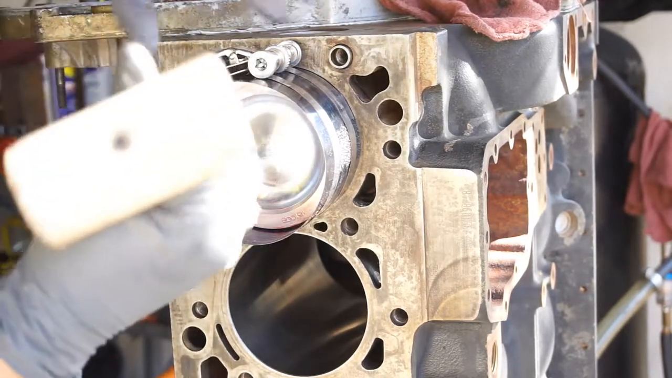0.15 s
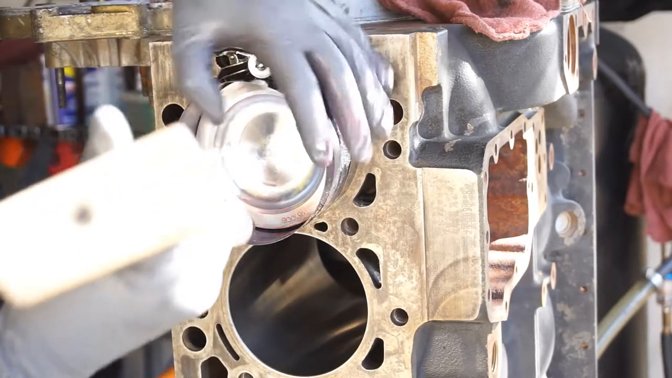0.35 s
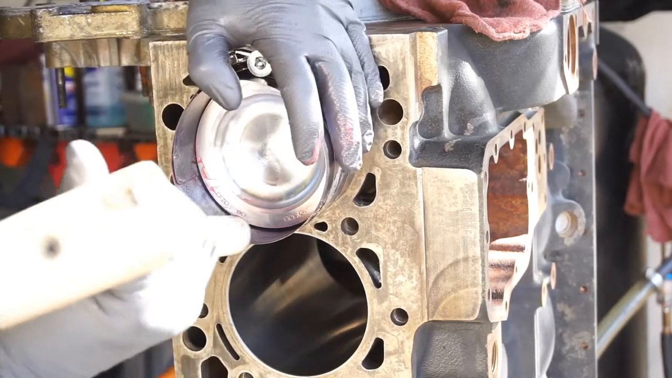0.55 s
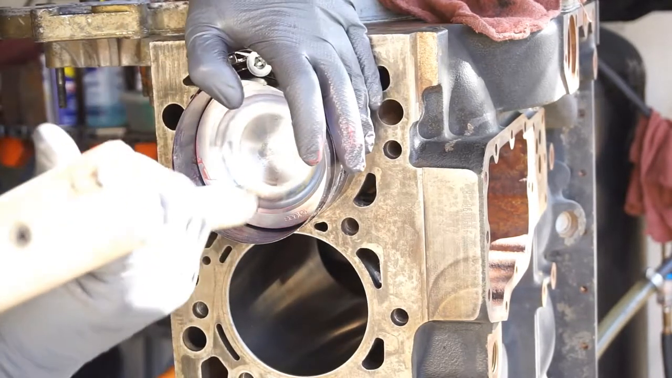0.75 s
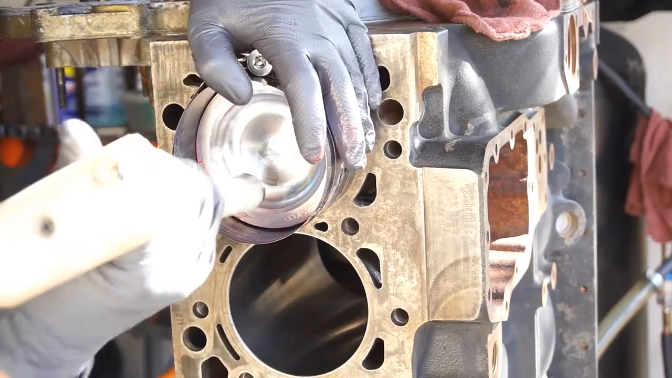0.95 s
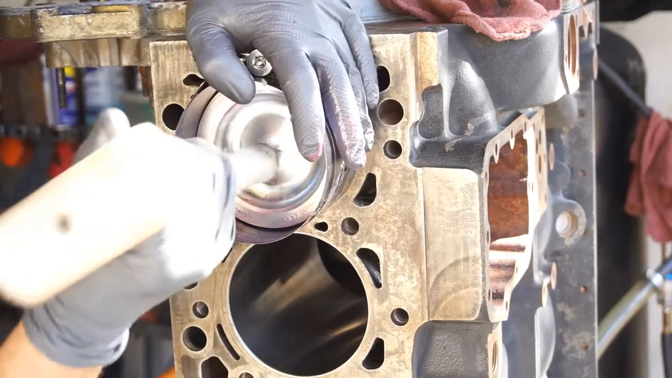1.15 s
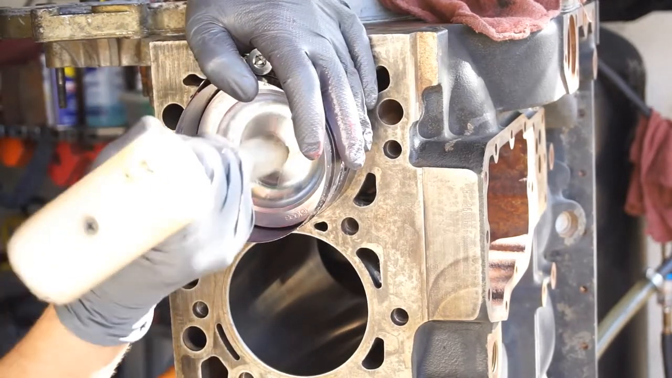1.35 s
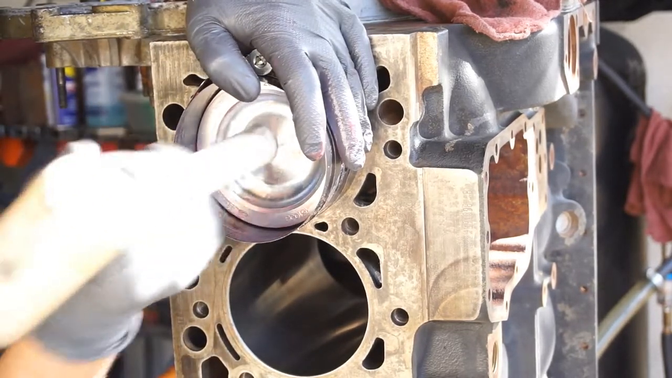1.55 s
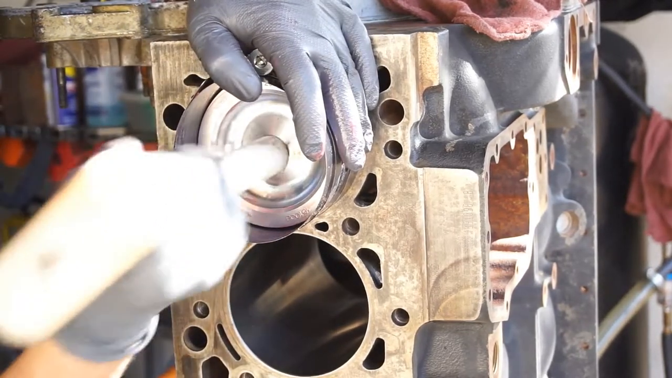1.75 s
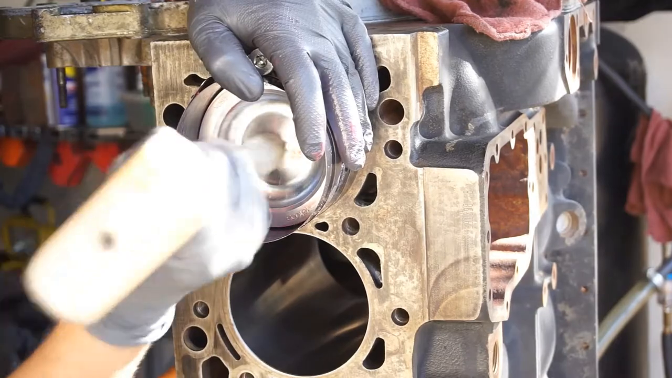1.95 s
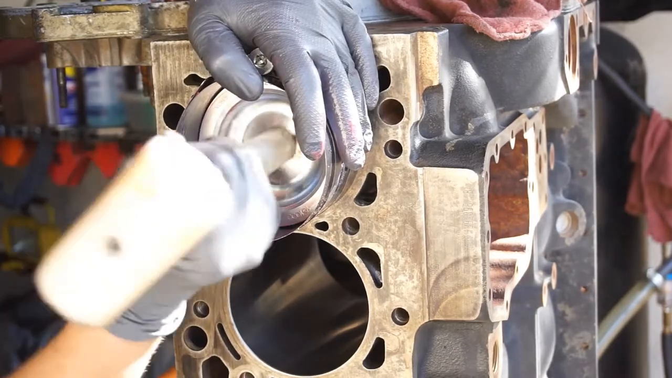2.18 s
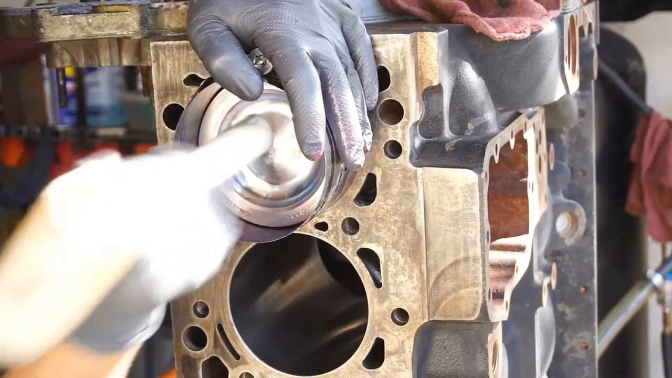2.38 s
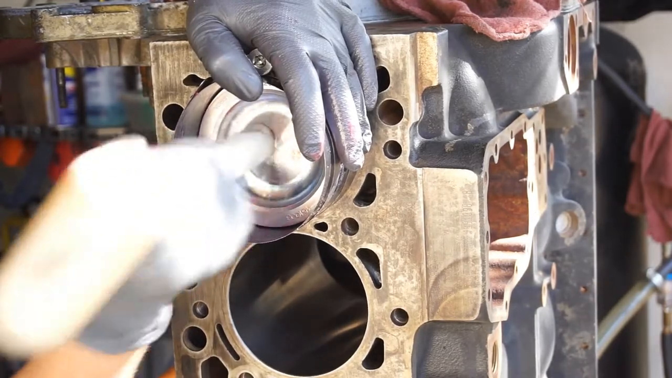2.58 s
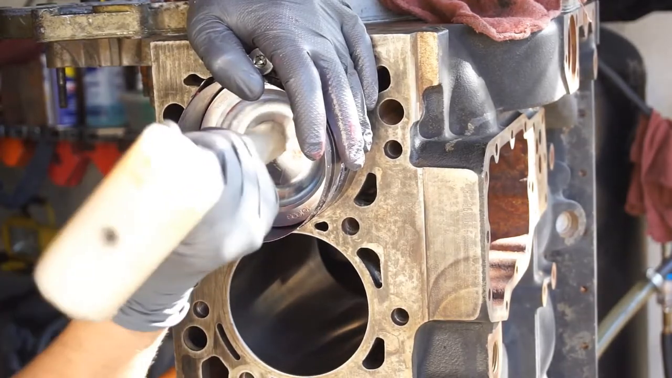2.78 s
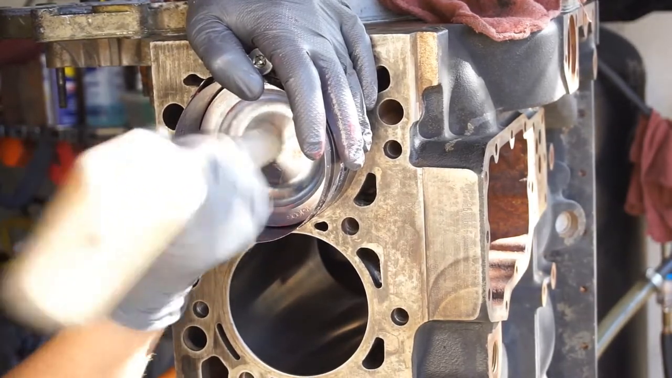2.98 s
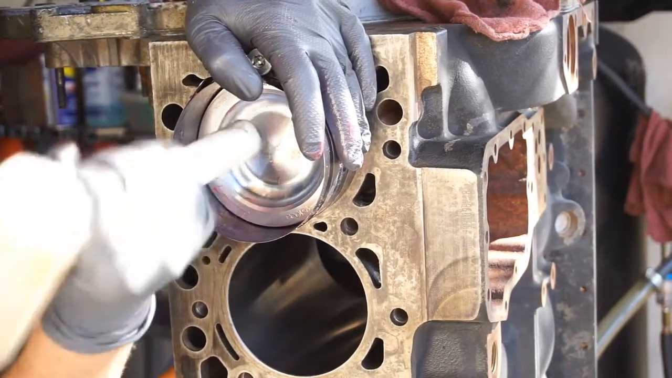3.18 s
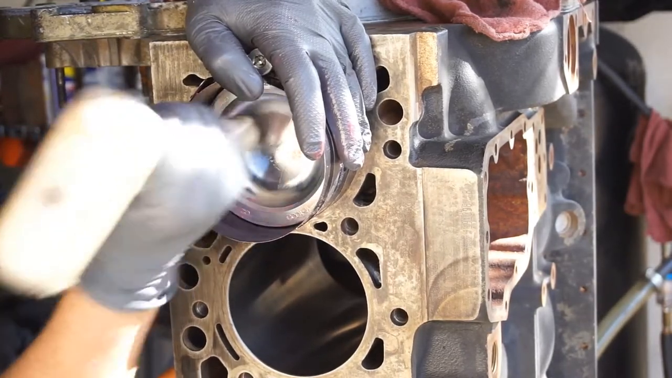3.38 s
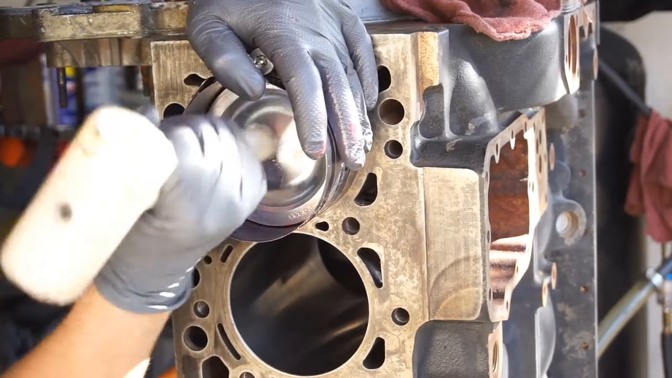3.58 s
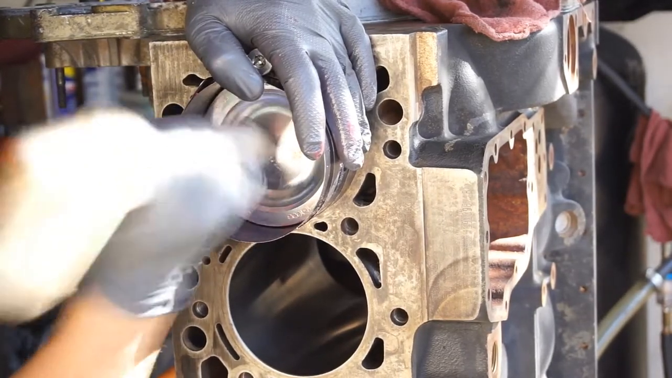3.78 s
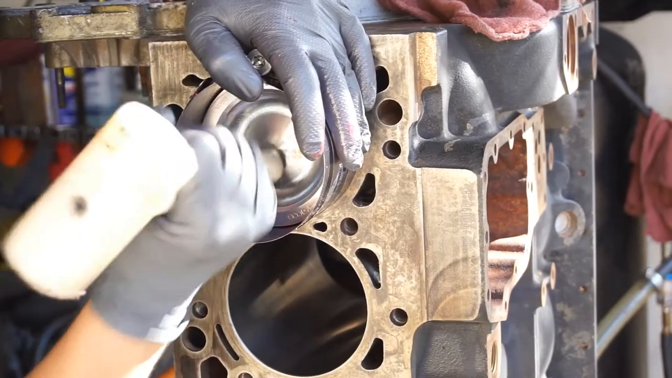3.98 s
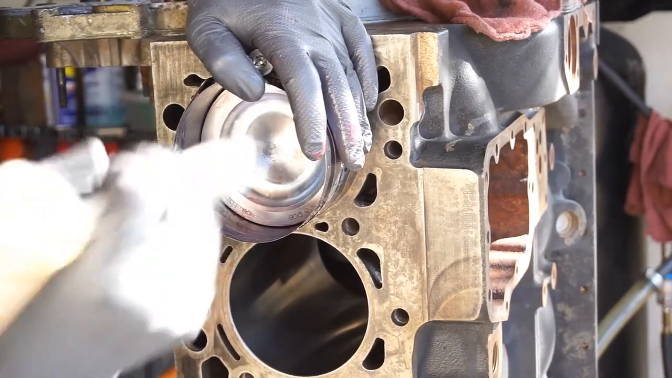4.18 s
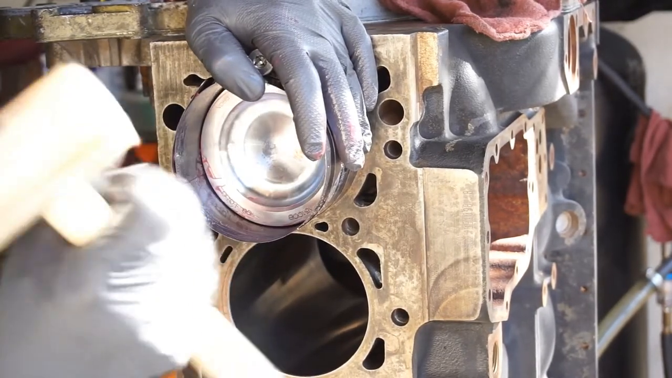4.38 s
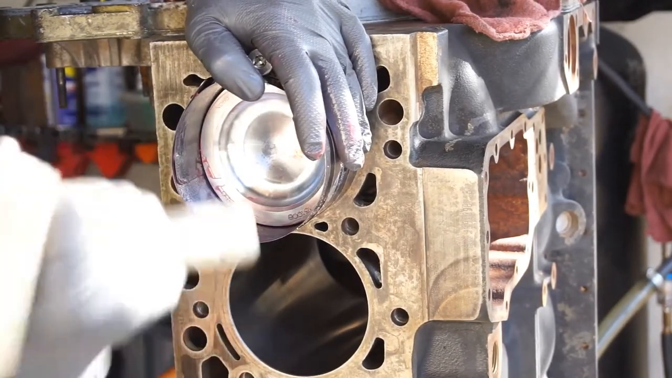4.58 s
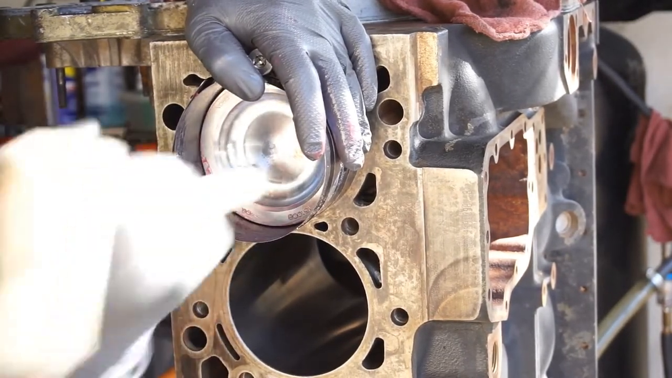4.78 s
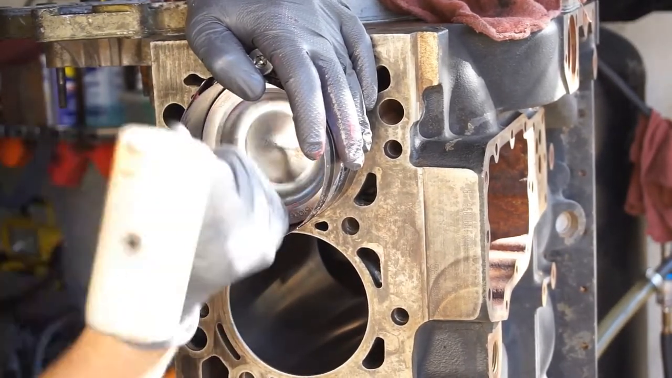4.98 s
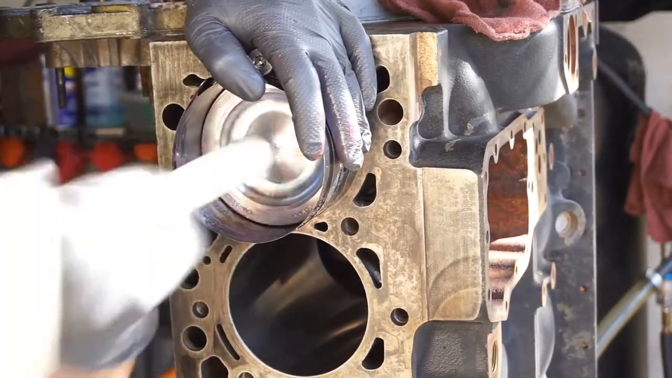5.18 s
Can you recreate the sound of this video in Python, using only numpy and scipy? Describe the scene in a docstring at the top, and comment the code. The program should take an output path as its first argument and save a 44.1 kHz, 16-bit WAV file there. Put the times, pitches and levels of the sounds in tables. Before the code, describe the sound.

Close in a hard-walled workshop, rubber gloves rub and shift with small clicks for just over a second. Then a wooden handle knocks a metal piston ten times, almost four a second, each a woody clack with an instant rebound, a thin steel rattle and hollow block ringing. A pause of about a second brings bright grip clicks, then two more taps. Stereo microphone, taps slightly left.

```python
"""A hard-walled workshop: a wooden hammer handle taps a piston down through a ring compressor into an engine block.
Each tap is a short wood pulse with a rebound milliseconds later; both carry a noisy rattle of the steel band.
Block and workshop answer with decaying noise and modes, recoloured as the piston sinks: ten taps, a pause, two more.
Before the taps and in the pause, gloved hands rub (swelling coloured noise) and shift their grip (noise clicks).
Underneath lie still air, a faint fluttering squeak and a thin wavering tone."""
import sys
import numpy as np
from scipy import signal
from scipy.fft import rfft, irfft, next_fast_len
from scipy.io import wavfile
from scipy.ndimage import map_coordinates

SR = 44100
rng = np.random.default_rng(int(sys.argv[2]) if len(sys.argv) > 2 else 0)


def file_out(sig):
    """Save sig as 16-bit WAV at sys.argv[1]."""
    # one column per channel
    cols = np.atleast_2d(sig).T
    # limit, then scale
    lim = np.clip(cols, -1, 1)
    pcm = np.round(lim * 32767).astype(np.int16)
    wavfile.write(sys.argv[1], SR, pcm)


N = 231348  # length [samples]
TOP_HZ = 11130  # upper band limit

# modes of block and workshop: (frequency [Hz], level [dB])
RESONANCES = [(252, -3), (264, -5), (292, -10.5), (305, -10), (371, -14.5), (390, -20), (443, -12),
              (471, -9.5), (483, -8), (542, -13), (582, -6), (595, -3.5), (616, -9), (627, -10.5),
              (702, -14.5), (750, -7.5), (785, -8), (896, -4.5), (938, -26), (1021, -6.5), (1050, -8),
              (1135, -11), (1163, -14), (1349, -26), (1367, -10.5), (1474, -9), (2083, -12.5), (2111, -6.5),
              (2160, -36), (2271, -11.5)]
# how long block and workshop ring: (frequency [Hz], t60 [s])
DECAY = [(100, 1), (260, 0.98), (600, 0.8), (1400, 0.71), (2200, 0.63), (4000, 0.55), (10000, 0.41)]
# likeness of left and right in diffuse sound: (frequency [Hz], correlation [-1..1])
ALIKE = [(60, 0.93), (150, 0.88), (270, 1), (580, 0.83), (1230, 0.51), (2610, 0.34), (5540, 0.015),
         (11000, 0.21)]


def amp(db):
    """Decibels to gain."""
    return 10 ** (np.asarray(db) / 20)


def unit(x):
    """x scaled to rms 1."""
    return x / np.sqrt(np.mean(x ** 2) + 1e-20)


def along(points, hz):
    """Interpolates (Hz, value) points on a log frequency axis."""
    f, v = np.transpose(points)
    return np.interp(np.log(hz + 1), np.log(f + 1), v)


def wobble(rate):
    """A smooth random curve, rate knots a second."""
    knots = rng.standard_normal(int(N * rate / SR) + 4)
    return map_coordinates(knots, [np.arange(N) * rate / SR])


def filtered(x, response):
    """x shaped by a response of frequency."""
    n = x.shape[-1]
    m = next_fast_len(n + SR // 10)
    return irfft(rfft(x, m) * response(np.fft.rfftfreq(m, 1 / SR)), m)[..., :n]


def pulse(spectrum, size):
    """A minimum-phase pulse: the spectrum's energy arrives as early as it can."""
    hz = np.fft.rfftfreq(size, 1 / SR)
    cepstrum = irfft(np.log(amp(along(spectrum, hz))), size)
    cepstrum[1:size // 2] *= 2
    cepstrum[size // 2 + 1:] = 0
    return irfft(np.exp(rfft(cepstrum)) * (hz < TOP_HZ + 1000), size)


def noise(spectrum, size):
    """Diffuse stereo noise of rms 1, its left-right likeness set by frequency."""
    def colour(hz):
        turn = np.arccos(np.clip(along(ALIKE, hz), -1, 1)) / 2
        return amp(along(spectrum, hz)) * (hz < TOP_HZ) * [np.cos(turn), np.sin(turn)]

    mid, side = filtered(rng.standard_normal((2, size)), colour)
    return unit(np.array([mid + side, mid - side]))


def panned(x, pan_db):
    """Left louder than right by pan_db."""
    return x * amp(np.array([pan_db, -pan_db]).reshape(2, -1) / 2)


def add(track, s, x):
    """Mixes x into the track at time s."""
    part = track[:, round(s * SR):][:, :x.shape[-1]]
    part += x[..., :part.shape[1]]


def blend(steady, fresh, share):
    """Two noises mixed at constant power."""
    share = np.clip(share, 0, 1)
    return np.sqrt(share) * steady + np.sqrt(1 - share) * fresh


def swelling(middle, length):
    """A gain that swells to 1 and fades evenly, 8 dB down at half its length from the middle."""
    away = np.abs(np.arange(N) / SR - middle) / (length / 2)
    return amp(-np.minimum(8 * away ** 1.5, 200))


def still_air():
    """Still workshop air: a steady, faint diffuse noise."""
    # colour of the air: (frequency [Hz], relative level [dB])
    air_colour = [(18, -79), (30, -33), (264, -11.5), (392, -3.5), (567, -0.5), (1160, -5.5), (1860, -8),
                  (5370, -12.5), (7230, -12.5), (11000, -13), (14300, -43), (22000, -120)]
    return amp(-61.0) * noise(air_colour, N)


def thin_tone():
    """A faint sine of wavering pitch comes and goes, from the pause into the last taps."""
    # swells of the tone: (middle [s], length [s], level [dB])
    swells = [(4.452, 0.11, -62), (4.6, .075, -60), (4.723, 0.032, -53), (4.863, 0.11, -58),
              (5.16, 0.17, -58)]
    tone_hz = 2000 + 9 * wobble(60)
    phase = 2 * np.pi * np.cumsum(tone_hz) / SR
    gain = sum(amp(db) * swelling(s, length) for s, length, db in swells)
    return gain * np.sin(phase)


def squeak():
    """A faint squeak as the handle is lined up: a narrow band of noise, fluttering quickly."""
    flutter_hz = 57 + 4 * wobble(9.9)
    flutter = 1 + .3 * np.sin(2 * np.pi * np.cumsum(flutter_hz) / SR)
    colour = [(400, -26.5), (1000, -6), (1330, -6), (1460, 5), (1580, -23), (1850, -12), (4000, -60)]  # Hz, dB
    grain = noise(colour, N) * flutter
    return amp(-53.5) * swelling(middle=0.99, length=0.2) * panned(grain, pan_db=-5)


def hands():
    """Rubber gloves slide over handle and compressor in many tiny slips: a dull rub and a bright hiss, roughened."""
    # strokes: (middle [s], length [s], rub level [dB], hiss level [dB], hiss left minus right [dB])
    strokes = [(0.075, 0.33, -48.5, -53, 6), (0.311, 0.15, -51, -55.5, 3), (.44, 0.1, -45.5, -42.5, -1),
               (.55, 0.24, -55.5, -58.5, 3), (0.81, 0.39, -61, -64, 0), (1.042, 0.099, -64, -66, 4),
               (1.24, 0.4, -53.5, -61, 5), (4.337, 0.052, -69, -44.5, 10.5), (4.428, 0.1, -70, -52.5, 9.5),
               (4.608, .1, -59.5, -58.5, 6)]
    # colour of the rub: (frequency [Hz], relative level [dB])
    rub_colour = [(60, -32), (200, -15), (300, -3.5), (500, -3.5), (1100, -1), (2200, -5), (4000, -12.5),
                  (8000, -22)]
    # colour of the glove hiss: (frequency [Hz], relative level [dB])
    hiss_colour = [(500, -37), (1200, -33), (2200, -15), (4300, -5), (6500, -6.5), (11000, -2)]
    rub_power, hiss_power = np.zeros(N), np.zeros((2, N))
    for s, length, rub_db, hiss_db, pan_db in strokes:
        stroke = swelling(s, length)
        rub_power += (amp(rub_db) * stroke) ** 2
        hiss_power += panned(amp(hiss_db) * stroke, pan_db) ** 2
    scuffs = amp(2.3 * wobble(70) + 1.2 * wobble(250))
    slips = amp(2.5 * wobble(900) + 1.2 * wobble(60))
    rub = np.sqrt(rub_power) * unit(noise(rub_colour, N) * scuffs)
    hiss = np.sqrt(hiss_power) * unit(noise(hiss_colour, N) * slips)
    return rub + hiss


def grip():
    """Clicks and scuffs as fingers and handle are set in place: noise bursts, the longer ones starting more softly."""
    # clicks and scuffs: (time [s], level [dB], centre of colour [Hz], t60 [s])
    clicks = [(.229, -53, 775, 0.07), (0.463, -37.5, 2730, 0.12), (.783, -41, 9600, 0.013),
              (1.035, -43, 9300, 0.0067), (1.135, -47.5, 6260, .13), (4.299, -46.5, 6540, 0.053),
              (4.336, -41, 6240, .029), (4.4579, -33, 4160, 0.017)]
    octaves, rise, left_db = 1, 0.036, 3.5  # width of colour, rise time over t60, left minus right
    out, t = np.zeros((2, N)), np.arange(SR // 4) / SR
    for s, db, centre_hz, t60 in clicks:
        hump = lambda hz: np.exp(-.5 * (np.log2((hz + 1) / centre_hz) / octaves) ** 2)
        grain = unit(filtered(noise([(100, 9), (10000, 3)], len(t)), hump))
        shape = (1 - np.exp(-t / (rise * t60))) * amp(-60 * t / t60)
        tail = amp(-19.5 - 60 * t / 0.38)
        add(out, s, panned(grain, left_db) * amp(db) * (shape / shape.max() + tail))
    return out


def wash(t):
    """Diffuse ringing of block and workshop; each frequency dies at its own speed."""
    # colour of the ringing: (frequency [Hz], relative level [dB])
    ringing_colour = [(40, -29.5), (150, -26), (215, -6), (300, -1), (380, -1.5), (600, 0.5), (1400, -0.5),
                      (1720, -4.5), (2150, -1.5), (3100, -6), (3600, -6.5), (5500, -11), (6800, -14),
                      (11000, -22.5)]
    hz, s, z = signal.stft(noise(ringing_colour, len(t)), SR, nperseg=256)
    fade = amp(-60 * s / along(DECAY, hz)[:, None])
    return signal.istft(z * fade, SR, nperseg=256)[1][:, :len(t)]


def resonances(t, phase, scatter_db, slip):
    """Decaying sines: every tap wakes the same modes at slightly new strengths and phases."""
    hz, db = np.transpose(RESONANCES)[:, :, None]
    strength, shift, apart = rng.standard_normal((3, len(hz), 1))
    spread = np.arccos(np.clip(along(ALIKE, hz), -1, 1)) * np.sign(apart) / 2  # left-right phase
    fickle = np.sqrt(hz / 1000)  # short waves care more where the handle lands
    swing = 2 * np.pi * (hz * t + phase + slip * fickle * shift)
    fade = amp(db + scatter_db * np.tanh(fickle * strength) - 60 * t / along(DECAY, hz))
    return np.array([np.sum(fade * np.sin(swing + side * spread), 0) for side in (1, -1)])


def answer(t, rise_s, hold_s, drop_db, fall_s):
    """A gain for the ringing: it builds up, holds, then sinks by a further drop_db."""
    return (1 - np.exp(-(t / rise_s) ** 2)) * amp(-drop_db / (1 + np.exp(-(t - hold_s) / fall_s)))


def contact(t, rattle_db, rattle_t60):
    """One push of wood on the piston, its echo off the block's deck, and the steel band's short rattle."""
    # wood on the piston crown: (frequency [Hz], relative level [dB])
    wood_colour = [(40, -44.5), (140, -26.5), (240, 0), (400, 0), (570, 6), (1000, 4.5), (1400, 6.5),
                   (1700, -1), (2150, -1.5), (2650, -3), (3100, -13.5), (5000, -8), (7000, -35),
                   (11000, -11)]
    # the compressor's steel band: (frequency [Hz], relative level [dB])
    steel_colour = [(300, -89), (1600, -19.5), (2200, 7.5), (3100, -2.5), (5200, -7.5), (7000, -5.5),
                    (11000, -16)]
    deck = lambda hz: 1 + amp(-11.5) * np.exp(-2j * np.pi * hz * 0.001472)  # echo delay in s
    push = filtered(pulse(wood_colour, len(t)) * np.linspace(1, 0, len(t)), deck)
    push /= np.sqrt(np.sum(push ** 2) / (.006 * SR))  # the energy of 6 ms at rms 1
    rattle = noise(steel_colour, len(t)) * amp(rattle_db - 60 * t / rattle_t60) * (1 - np.exp(-t / 0.0001))
    return push + rattle


def band_colour(hz, band_hz, peak_db, ripple_db):
    """The thin steel band's colour in dB: one main resonance and many lesser ones that shift at every tap."""
    main = peak_db * np.exp(-.5 * ((hz - band_hz) / 380) ** 2)
    lesser = map_coordinates(rng.standard_normal(size=256), [hz / 110], mode="mirror")
    return main + ripple_db * lesser * np.clip(hz / 1000 - 2, 0, 1)


def tap_colour(hz, depth, ring_hz, band_hz):
    """Stereo gain of a tap: block boom, piston ring and steel band, tuned by the piston's depth."""
    # left minus right of the taps: (frequency [Hz], difference [dB])
    leftward = [(100, -0.5), (260, 0.5), (600, 1.4), (1100, 2.5), (2100, 1.7), (4000, 2.5), (9000, 2)]
    boom_hz, boom_db = 295 - 45 * depth, 1 + 2.5 * depth ** 2  # the boom sinks and grows
    treble_db = -8.5 * (depth - 0.72) ** 2  # the rattle is brightest part-way down
    body = along([(130, 0), (boom_hz, boom_db), (480, 0), (2400, 0), (3400, treble_db)], hz)
    # the bore mutes the ring a little
    ring = (6.5 - 0.5 * depth) * np.exp(-.5 * ((hz - ring_hz) / 230) ** 2)
    steel = band_colour(hz, band_hz, peak_db=5.0, ripple_db=3.5)
    sides = np.outer([.5, -.5], along(leftward, hz))  # the camera's body shades short waves more
    return amp(body + ring + steel + sides)


def taps():
    """Knock, rebound and the workshop's answer; depth runs from 0 at the first tap to 1 at the last."""
    # taps: (time [s], level [dB], rebound after [s], rebound relative level [dB], steel band [Hz])
    hits = [(1.2619, -24, .0075, -2, 3600), (1.5553, -20.5, .0061, -5, 4360), (1.818, -23, .0066, -3, 4530),
            (2.0872, -20.5, .0076, -5, 4700), (2.365, -19, .0066, -3.5, 4700),
            (2.6442, -19.5, .0076, -4, 5300), (2.9245, -22, .0066, -2, 3630), (3.193, -21, .0068, -2, 3550),
            (3.4931, -24.5, .0064, -3.5, 3500), (3.7325, -22.5, .0066, -3.5, 3320),
            (4.8757, -25, .0089, -1.5, 4260), (5.1801, -22, .0052, -5.5, 4400)]
    firm_db, ringing_db, follow = -21.5, -.5, 0.41  # a firm tap, its ringing, dB of ringing per dB of tap
    loose_db, seated_depth = -4, 0.23  # the block rings less until the piston's skirt has seated in the bore
    out, t = np.zeros((2, N)), np.arange(2 ** 15) / SR
    brief = t[:2 ** 12]
    # the walls stay put, so much of the answer repeats
    walls, phase = wash(t), rng.random((len(RESONANCES), 1))
    wash_shape = answer(t, rise_s=0.0043, hold_s=0.17, drop_db=6.5, fall_s=0.028)
    mode_shape = answer(t, rise_s=.02, hold_s=.18, drop_db=14.5, fall_s=0.023)
    for depth, hit in zip(np.linspace(0, 1, len(hits)), hits):
        s, db, rebound_s, rebound_db, band_hz = hit
        tap = np.zeros((2, len(t)))
        knock = amp(-0.34) * contact(brief, rattle_db=0.0, rattle_t60=0.024)
        add(tap, 0, knock)
        add(tap, rebound_s, amp(rebound_db) * contact(brief, rattle_db=2.0, rattle_t60=0.032))
        for delay in rng.uniform(0.017, 0.049, size=5):  # echoes off things nearby
            add(tap, delay, amp(-13.0 - 280 * delay) * knock)
        # the piston's short ring is lower at each tap as it enters the bore
        ring_hz = 2227 - 282 * depth ** 3
        piston = amp(-13.5 - 60 * t / 0.06) * np.sin(2 * np.pi * ring_hz * t)
        diffuse = amp(-5.0) * blend(walls, wash(t), share=0.69)
        modes = amp(-9) * resonances(t, phase, scatter_db=5.5, slip=0.064)
        # relative to the tap, so softer taps ring proportionally more
        room_db = ringing_db + (follow - 1) * (db - firm_db) + loose_db * np.exp(-depth / seated_depth)
        tap += amp(room_db) * (wash_shape * (diffuse + piston) + mode_shape * modes)
        add(out, s, amp(db) * filtered(tap, lambda hz: tap_colour(hz, depth, ring_hz, band_hz)))
    return out


def scene():
    """All layers, from the still air to the taps."""
    return still_air() + thin_tone() + squeak() + hands() + grip() + taps()


def record(dry):
    """Sound reaches the camera's left port a little early; a steep low-pass keeps nothing much above TOP_HZ."""
    lead = 2e-5  # s
    ports = lambda hz: np.exp(1j * np.pi * lead * np.array([hz, -hz]))
    low_pass = lambda hz: 1 / np.sqrt(1 + (hz / TOP_HZ) ** 160)
    return filtered(dry, lambda hz: ports(hz) * low_pass(hz))


dry = scene()
out = record(dry)
file_out(out)
```